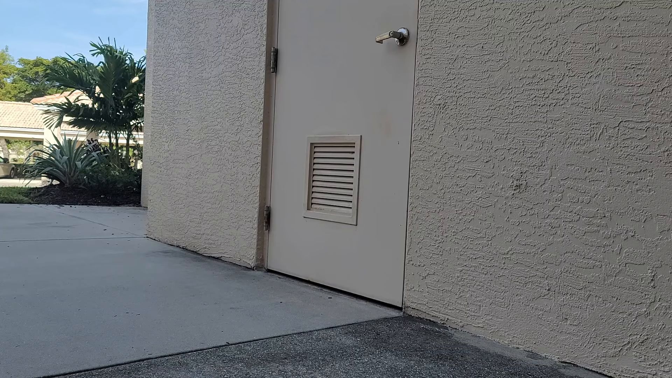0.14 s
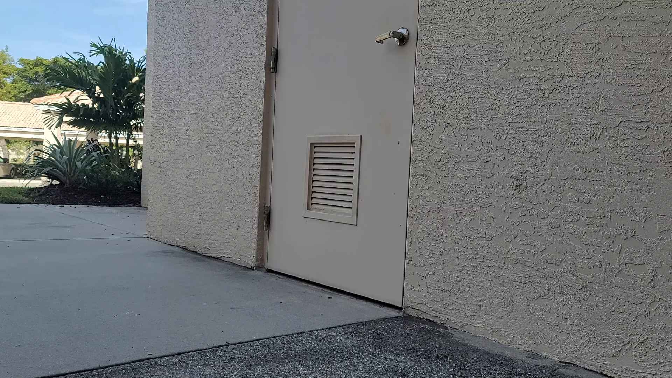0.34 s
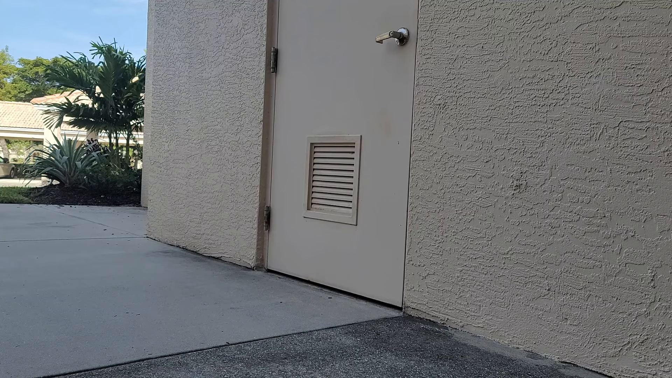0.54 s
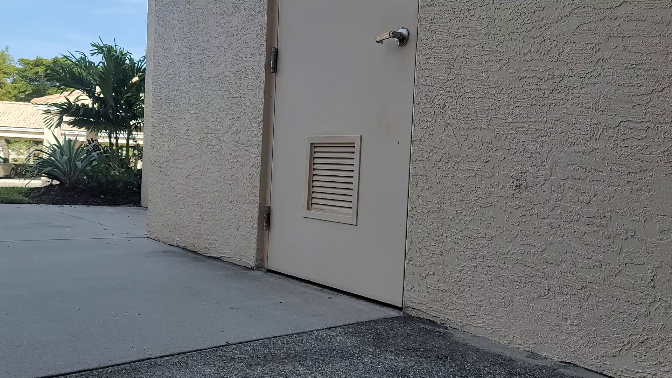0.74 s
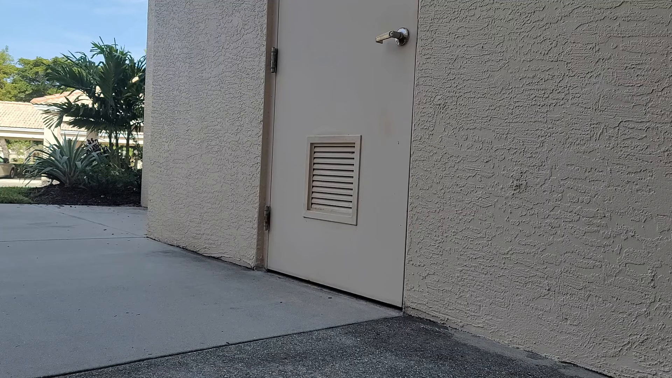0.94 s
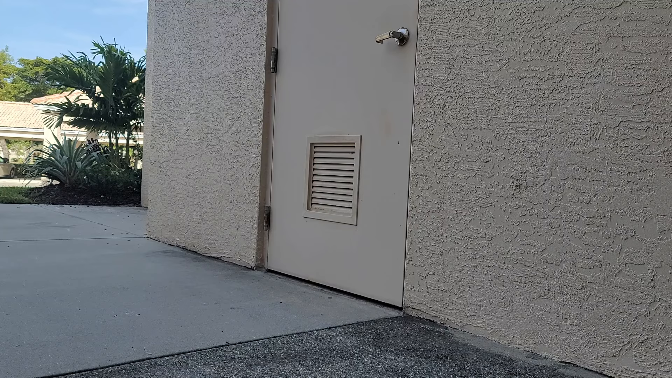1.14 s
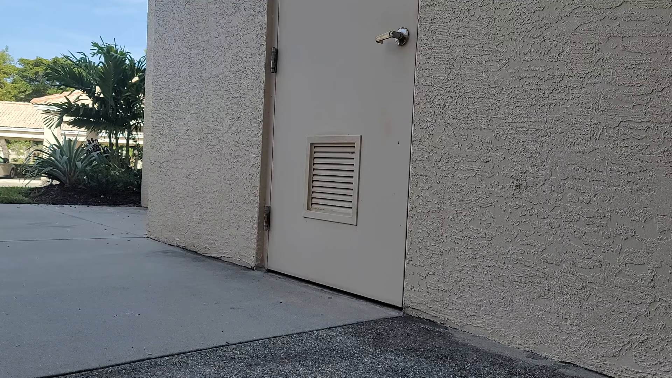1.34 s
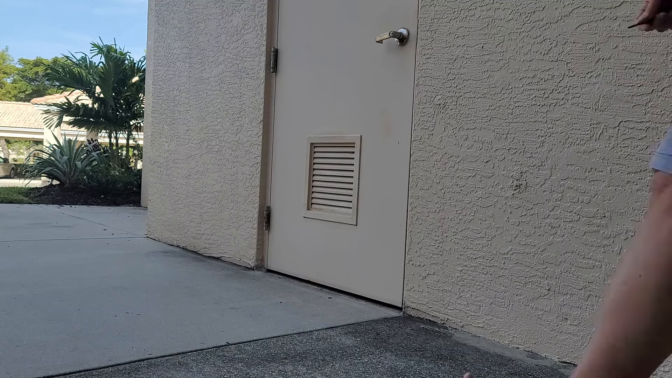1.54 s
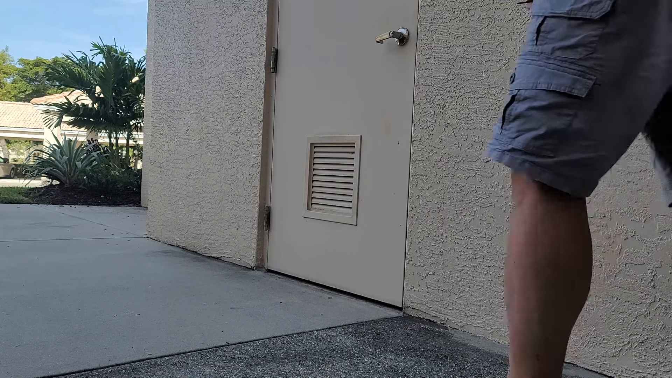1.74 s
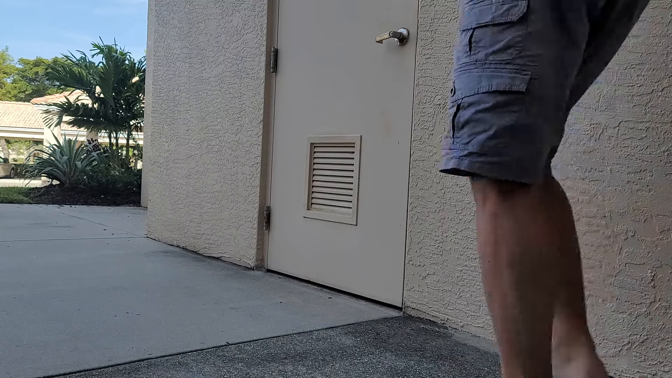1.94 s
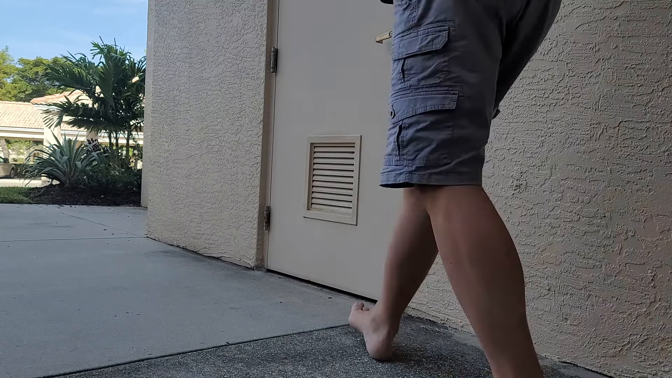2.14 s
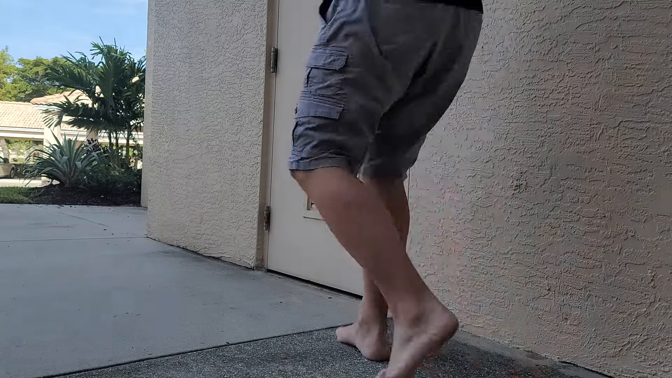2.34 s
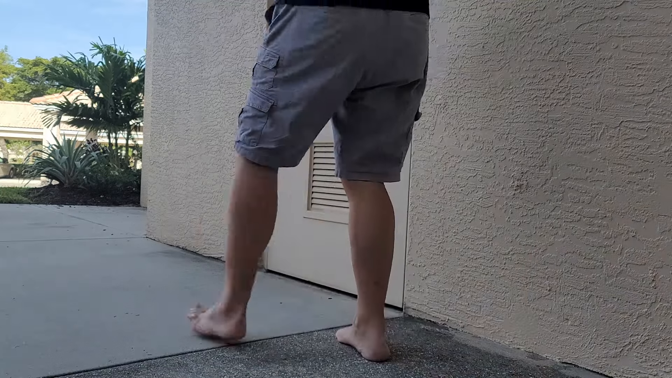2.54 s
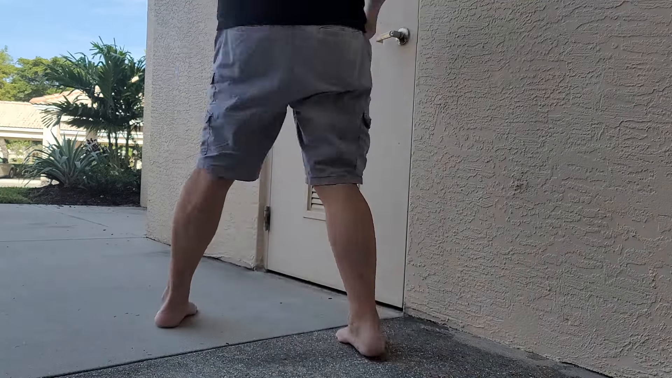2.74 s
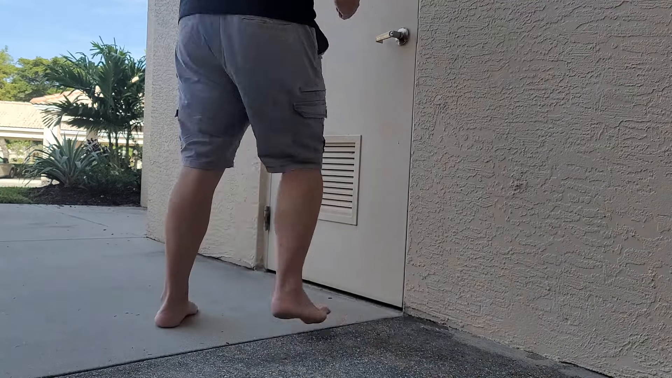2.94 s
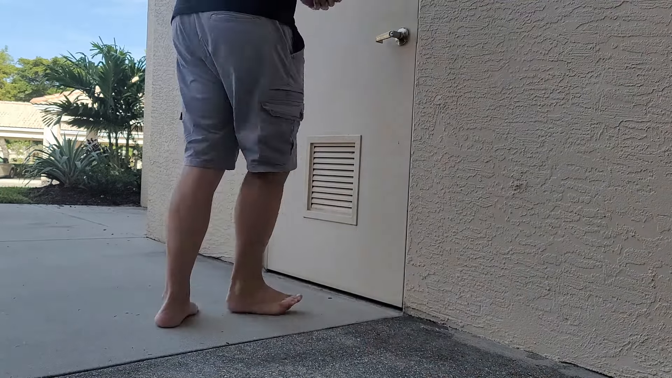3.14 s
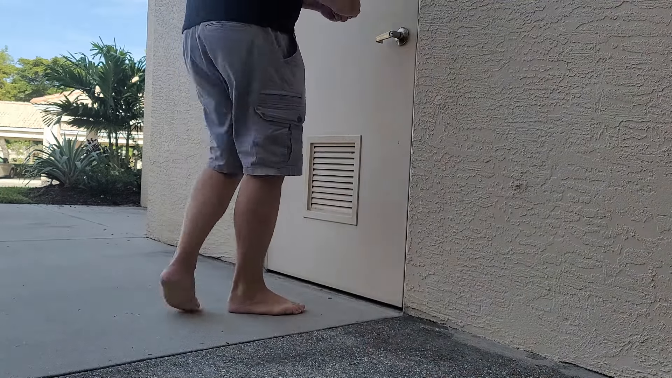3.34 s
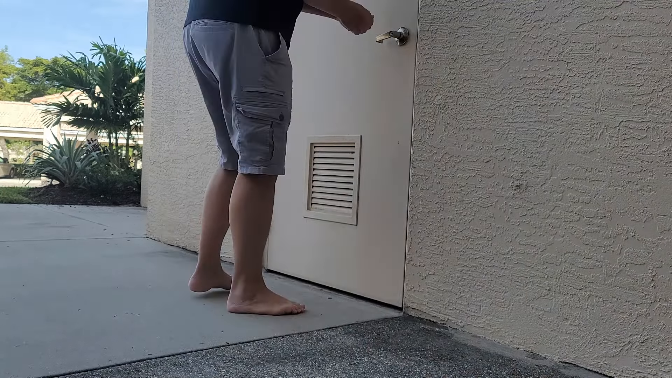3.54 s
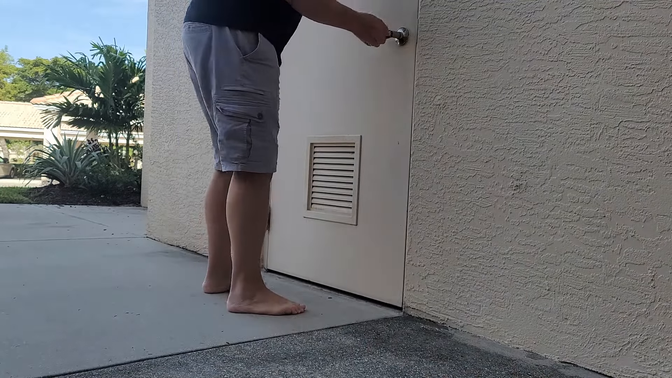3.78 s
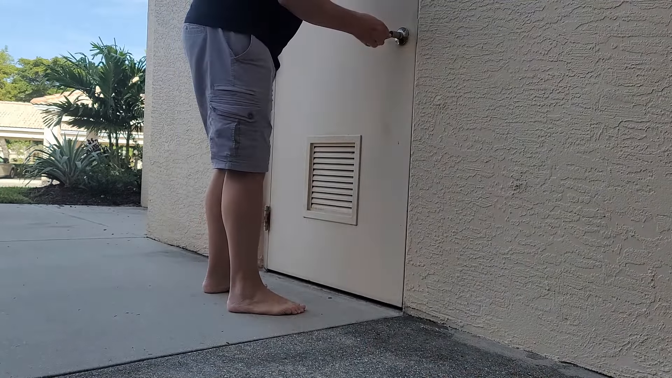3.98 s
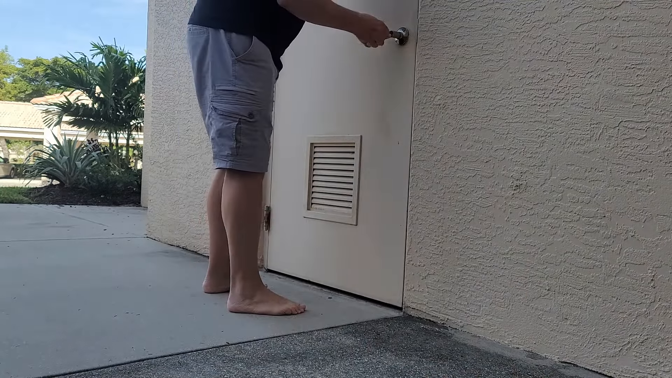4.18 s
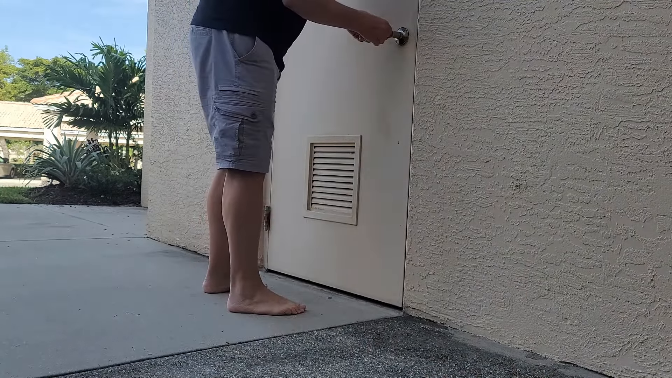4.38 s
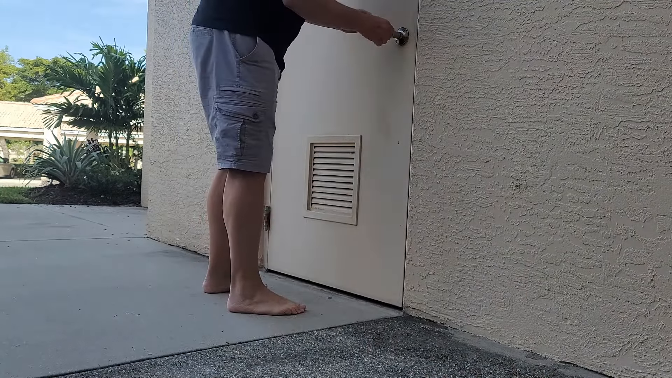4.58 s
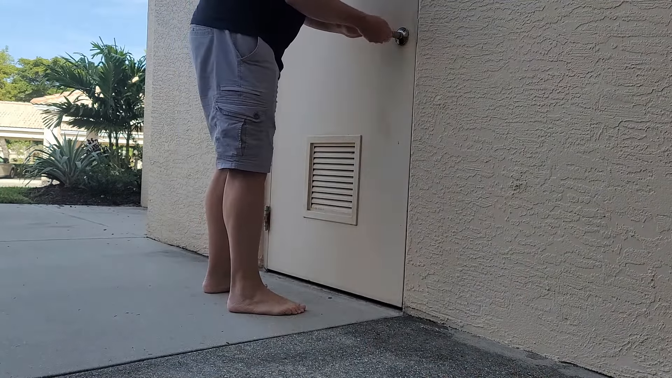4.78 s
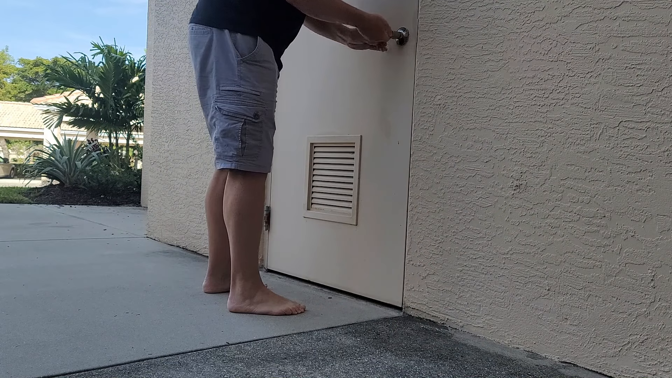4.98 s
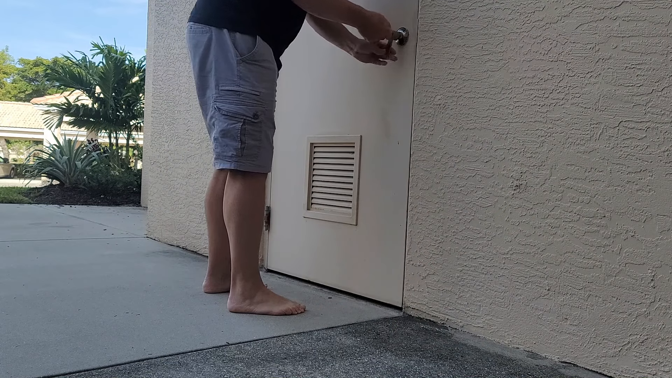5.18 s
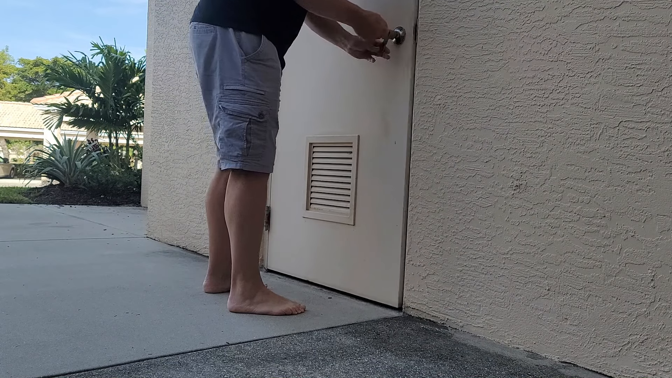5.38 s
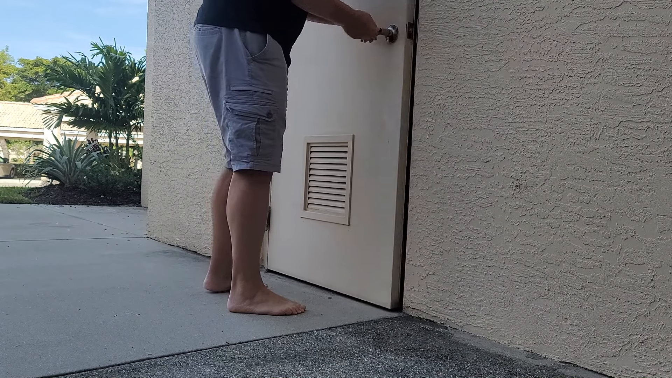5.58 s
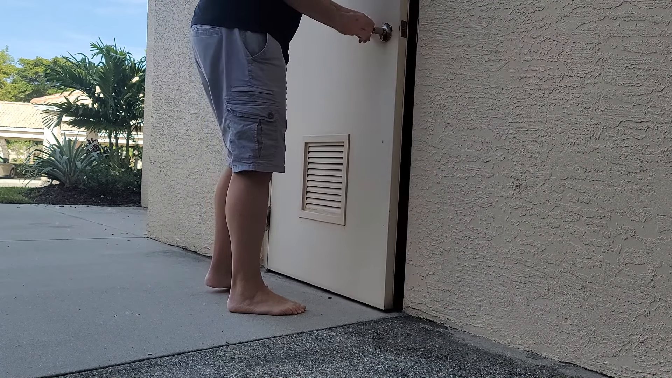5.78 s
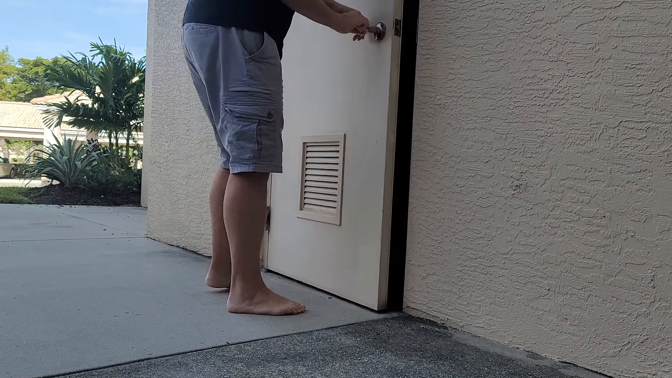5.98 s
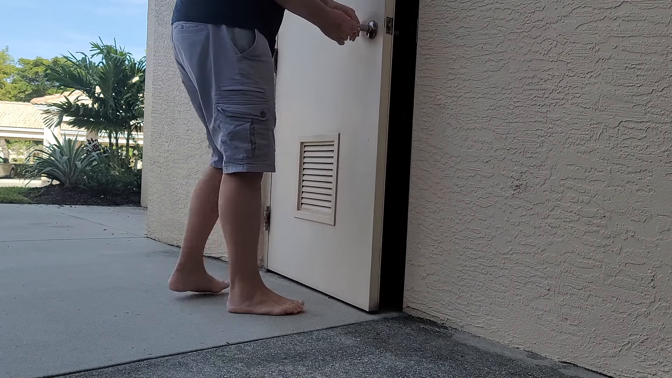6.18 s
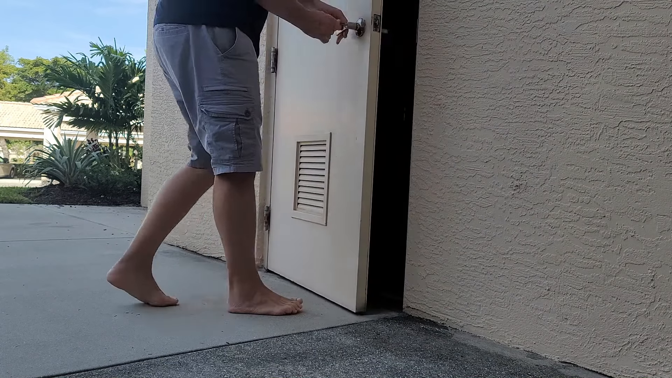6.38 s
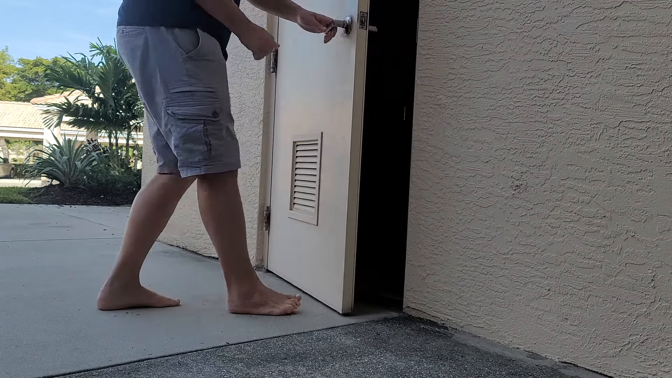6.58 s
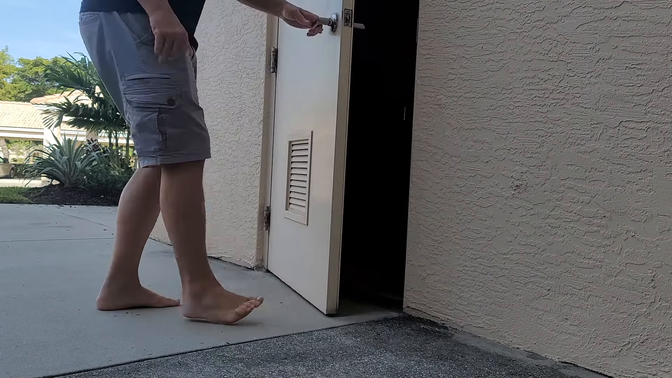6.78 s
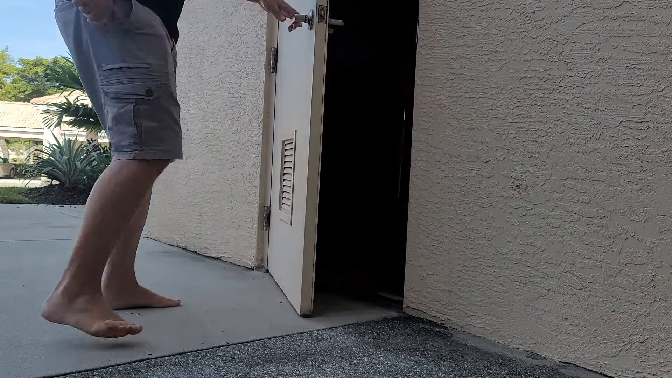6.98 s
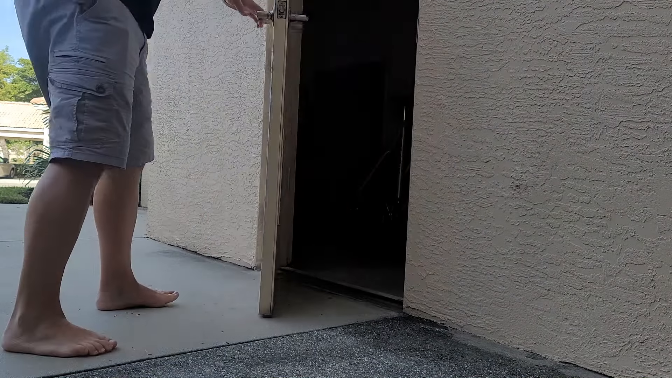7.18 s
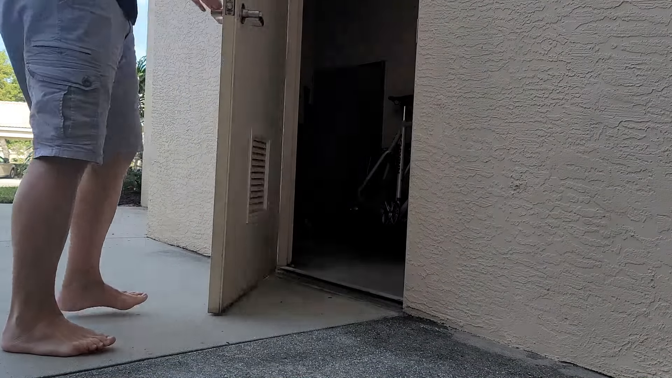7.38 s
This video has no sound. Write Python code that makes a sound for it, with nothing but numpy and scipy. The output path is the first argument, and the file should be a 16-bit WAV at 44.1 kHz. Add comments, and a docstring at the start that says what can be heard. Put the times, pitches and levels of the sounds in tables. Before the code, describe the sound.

Quiet outdoor porch, close stereo pickup. First only rumble and light rustling, then a short clink of keys and muffled barefoot steps. Small metallic ticks follow as the key enters and turns; the latch snaps, the door gives a deep hollow thud and trembles in its frame. Another clack and a light knock come before a thin, high key jingle and rising rustle.

```python
"""A faint rumble of distant traffic and machine hum is heard first, beneath a soft rustle of clothes.
A barefoot man walks up to a steel door in a stucco porch, takes out keys and works the lever lock.
The key ticks, the latch clacks, the door thumps and shudders free, and the keys jingle as it swings open.
Filtered noise makes the rumble, rustle and friction; shaped noise bursts make the contacts.
Sums of decaying sines make the ringing metal, the door and the heels; a decaying noise tail makes the porch."""
import sys
import numpy as np
from scipy import signal
from scipy.fft import rfft, irfft, next_fast_len
from scipy.io import wavfile
from scipy.ndimage import uniform_filter1d

SR = 44100
rng = np.random.default_rng(int(sys.argv[2]) if len(sys.argv) > 2 else 0)


def master(y):
    """Save y as 16-bit WAV."""
    cut = np.clip(np.atleast_2d(y).T, -1, 1)
    pcm = np.round(cut * 32767)  # scale
    wavfile.write(sys.argv[1], SR, pcm.astype(np.int16))


N = 327222
TIME = np.arange(N) / SR
HALF_SECOND = TIME[:SR // 2]

# Swell of the far traffic: (time [s], relative level [dB])
TRAFFIC_SWELL = [(0, -50.5), (.6, -51), (2.3, -48), (3.7, -50), (4.4, -48), (5.3, -47), (6.3, -47),
                 (6.8, -51), (7.42, -48)]
# Colour of the outdoor noise: (frequency [Hz], relative density [dB per Hz])
OUTDOOR_SPECTRUM = [(12, -16), (22, -9.5), (42, -6), (56, 0.5), (72, -1), (98, -5.5), (160, -6.5),
                    (210, -14.5), (330, -21.5), (520, -26), (1000, -34.5), (1500, -42), (2200, -48.5),
                    (4000, -81)]
# Tones of the machine: (frequency [Hz], relative level [dB])
HUM_TONES = [(76, -57), (311, -67), (436, -75), (825, -89)]
# Likeness of the two ears' noise: (frequency [Hz], likeness [0 to 1])
EAR_LIKENESS = [(25, 0.95), (70, 1), (150, 1), (300, 0.78), (600, 0.022), (1500, 0), (5000, 0), (14000, 0)]
# Decay of the porch: (frequency [Hz], decay time by 60 dB [s])
PORCH_DECAY = [(300, 0.079), (1500, 0.77), (5000, 0.28), (10000, 0.32), (16000, 0.36)]
# Hiss of moving clothes and air: (time [s], relative level [dB])
RUSTLE_LEVEL = [(0.0, -74), (0.8, -76), (1.26, -73), (2.55, -76), (2.98, -71), (3.14, -82.5), (3.27, -71),
                (3.39, -73), (3.76, -81.5), (4.09, -71.5), (4.3, -82), (4.48, -79.5), (5.19, -71),
                (5.35, -75.5), (5.76, -72.5), (5.95, -74.5), (6.84, -76), (7.05, -67), (7.42, -61.5)]
# Colour of the lower and upper hiss: (frequency [Hz], relative density [dB per Hz])
RUSTLE_LOW = [(1000, 8.5), (1800, 1.5), (3200, 3), (4800, 1.5), (6500, 4.5), (7100, 4), (7700, -21.5),
              (9000, -23)]
RUSTLE_HIGH = [(6000, -26), (7500, 9.5), (9000, 3), (12000, 8.5), (15500, 5), (17000, -18)]
# Position of the hands: (time [s], left-right below 8 kHz [dB], left-right above [dB], left lag [ms])
HAND_PLACE = [(0, -5, -5.5, 0.77), (1.22, -7, -5, 0.74), (2.3, -5, 1, 0.15), (3.2, -3, 1, 0.00011),
              (6.4, -3.5, 1.5, 0.077), (6.9, -2.5, 7, -0.53), (7.4, -4, 5.5, 0.12)]
# Bare feet: (time [s], relative level [dB])
FOOTFALLS = [(1.623, -26.5), (1.683, -23), (2.142, -22.5), (2.163, -20), (3.502, -25.5)]
# Modes of a heel on concrete: (frequency [Hz], level [dB], decay time by 60 dB [s])
HEEL_MODES = [(43.3, -3, 0.071), (61.5, 9.5, 0.071), (119, -9.5, 0.14)]
# Lever and door turning: (middle [s], half length [s], hollow door level [dB], spindle groan level [dB])
TURN_STROKES = [(4.19, 0.17, -57.5, -63.5), (4.45, 0.05, -65, -78), (5.095, .035, -50, -57.5),
                (5.288, 0.029, -46.5, -52), (5.626, 0.034, -52.5, -57), (6.25, 0.07, -68, -59.5),
                (6.43, 0.019, -59, -59)]
# Resonances of the hollow door and of the spindle: (frequency [Hz], width [Hz], level [dB])
HOLLOW_DOOR = [(162, 57, 3), (200, 24, 13.5), (346, 110, -3), (398, 57, -6.5), (577, 110, -4.5)]
SPINDLE_GROAN = [(360, 15, 3), (403.4, 15, 1)]
# Blows on the door: (time [s], relative level of the whole leaf [dB], of its panels [dB])
DOOR_BLOWS = [(4.437, -42, -40), (4.99, -38, -40.5), (5.046, -52, -35.5), (5.067, -25.5, -33),
              (5.093, -24, -54), (5.106, -27.5, -40), (5.263, -41, -53.5), (5.588, -53, -43),
              (5.723, -41.5, -52), (5.82, -37, -64), (6.398, -37.5, -44), (6.428, -31.5, -44.5)]
# Modes of the leaf and of its panels: (frequency [Hz], level [dB], decay time by 60 dB [s])
LEAF_MODES = [(62.3, 7.5, 0.13), (81.4, -0.5, 0.17)]
PANEL_MODES = [(138.7, 9, 0.073), (166.7, 7, 0.31), (179, 2, 0.079), (204.7, -0.5, 0.19), (246, -22, 0.16),
               (339, -15.5, 0.13)]
# Door pulling free of its frame: (frequency [Hz], relative level [dB], rise [s], fall [s])
FRAME_SHUDDER = (80, -19.5, .019, .045)
# Frequency ranges of contact noise, body, middle, bright and top: (low [Hz], high [Hz])
NOISE_RANGES = [(500, 1750), (1750, 4000), (3900, 6900), (7500, 16500)]
# Resonances of the lock case: (frequency [Hz], width [Hz], level [dB])
LOCK_RESONANCES = [(844, 140, 3.5), (1048, 150, -14), (1450, 66, -5), (2040, 2800, -17), (3530, 800, -19),
                   (5240, 170, -7), (6520, 240, -0.5)]
# Cloth, key and latch sliding: (middle [s], half length [s], relative level [dB], surface)
SLIDE_STROKES = [(0.248, 0.0063, -72, "cloth"), (.356, .019, -62.5, "cloth"), (0.634, 0.011, -67, "keys"),
                 (1.182, 0.043, -67.5, "cloth"), (1.775, 0.091, -70.5, "cloth"),
                 (2.291, 0.026, -63.5, "keys"), (2.373, 0.017, -60, "cloth"), (2.888, 0.024, -61, "cloth"),
                 (2.89, 0.0099, -61, "dry steel"), (3.217, 0.01, -66, "keys"),
                 (3.272, 0.02, -64.5, "cloth"), (3.405, 0.016, -64.5, "keys"),
                 (3.473, 0.016, -67.5, "keys"), (4.083, 0.017, -66, "dry steel"),
                 (4.393, 0.027, -60.5, "blade"), (4.446, 0.033, -51, "blade"),
                 (4.718, 0.028, -65.5, "latch"), (4.767, 0.021, -59, "latch"),
                 (5.072, 0.017, -56.5, "bolt"), (5.106, .022, -54.5, "bolt"),
                 (5.118, 0.025, -55.5, "lever"), (5.277, 0.029, -61.5, "lever"),
                 (5.56, 0.017, -56, "latch"), (5.591, 0.012, -50.5, "latch"), (5.64, 0.014, -55, "latch"),
                 (5.804, 0.0058, -64, "dry steel"), (5.86, 0.04, -65.5, "dry steel"),
                 (6.148, 0.014, -63.5, "cloth"), (6.216, 0.049, -66.5, "lever"),
                 (6.405, 0.012, -49.5, "blade"), (6.416, 0.016, -56, "keys"), (6.442, 0.013, -53, "blade"),
                 (6.716, 0.015, -66, "lever"), (6.852, 0.014, -61.5, "keys"), (6.907, 0.012, -55, "keys"),
                 (6.925, .025, -62, "keys"), (7.116, 0.018, -58.5, "dry steel"),
                 (7.224, 0.025, -63.5, "dry steel")]
# Colour of each sliding surface: (level in each of the four ranges [dB])
SURFACE_COLOURS = {"cloth": (-6.5, -6, 0.5, -4), "keys": (-45, -14.5, -1.5, 0),
                   "blade": (-11, -9.5, -7.5, -6.5), "latch": (0.5, -3, 1, -9.5),
                   "bolt": (-1.5, -10, -5.5, -10), "dry steel": (-9.5, -3.5, 0.5, -8.5),
                   "lever": (-20, -2.5, -8, -14.5)}
# The key scraping in the cylinder: (start [s], length [s], level [dB])
KEY_SCRAPES = [(4.075, 0.3, -71), (4.693, 0.065, -64.5), (4.985, 0.087, -64.5), (6.15, 0.22, -74)]
# Modes of the keyway: (frequency [Hz], level [dB], decay time by 60 dB [s])
KEYWAY_MODES = [(1600, -6, 0.0059), (2010, 3.5, 0.014), (2300, 1, 0.0098), (2800, -2, 0.0092),
                (3220, -2, .012), (4260, 3, 0.0063), (5400, -12, .004)]
# Keys and lock parts ringing: (time [s], level [dB], pitch blur by rattling [Hz], piece of metal)
RINGING_METAL = [(0.0, -65.5, 63, "house key"), (1.213, -45, 220, "bunch"), (1.226, -58.5, 220, "bunch"),
                 (3.34, -72, 89, "door key"), (3.379, -66, 100, "house key"),
                 (3.451, -52.5, 3, "small key"), (4.062, -58.5, 81, "cylinder"),
                 (4.448, -49, 120, "door key"), (4.772, -46, 170, "cylinder"), (4.772, -54.5, 34, "latch"),
                 (4.98, -59.5, 23, "latch"), (5.049, -54, 26, "lock case"), (5.082, -49, 25, "spring"),
                 (5.107, -50, 30, "lock case"), (5.129, -51, 46, "lock case"),
                 (5.268, -53, 51, "lock case"), (5.586, -47, 110, "latch"), (5.589, -46, 140, "spring"),
                 (5.892, -50, 87, "lever"), (6.386, -57, 52, "face plate"), (6.404, -44, 110, "face plate"),
                 (6.421, -52, 130, "face plate"), (6.44, -52, 150, "face plate"),
                 (6.9, -44.5, 62, "large key"), (6.9, -58, 43, "house key"), (7.018, -68, 120, "large key")]
# Modes of each piece of metal: (frequency [Hz], level [dB], decay time by 60 dB [s])
METAL_MODES = {"large key": [(4370, -30, 0.091), (5100, -8, 0.053), (6620, -10, 0.2), (7630, 4.5, .1),
               (8484, -7, 0.11), (10500, -13, 0.18), (11400, -18, .1), (11860, 12.5, 0.11),
               (11930, -1, 0.12), (13400, -6, 0.088), (15660, -8, 0.081)], "house key": [(6550, 4, 0.27),
               (7470, -6, 0.36), (11600, -1, 0.22)], "small key": [(7014, -3.5, 0.58)],
               "door key": [(10560, 4.5, 0.042), (10900, -0.5, 0.11), (11260, -2, 0.091), (11500, 0, 0.091),
               (13200, -7, 0.051)], "bunch": [(2120, -2.5, 0.039), (2450, -15, 0.041), (3590, -1.5, 0.052),
               (4300, -5, 0.018), (4730, -6, .014), (6100, -18, .013)], "lever": [(2460, 3, 0.034),
               (2720, 1, 0.028), (3330, -4, 0.029), (4350, 4, 0.03)], "spring": [(1935, 3.5, .035),
               (4650, -1.5, 0.065)], "lock case": [(495, -5.5, 0.37), (624, -3, 0.19), (740, -6, 0.28),
               (884, -1.5, 0.083), (1023, -2.5, 0.092), (1320, -13, .06), (1350, -14, 0.051)],
               "cylinder": [(1935, 2.5, 0.052), (2665, 1.5, 0.062), (3590, -7, 0.067), (4400, 0.5, 0.035),
               (4980, -1, 0.059), (5240, -9, 0.045), (5840, -1, 0.04)], "latch": [(849, 4.5, 0.15),
               (1087, -3, 0.1), (1470, -10, .06), (1960, -8, 0.052)], "face plate": [(1490, 0.5, 0.048),
               (2390, -2.5, 0.044), (3270, -16, 0.038), (4740, -9, .04)]}
# Key, cylinder and latch contacts: (time [s], relative level [dB], struck part's pitch [Hz], contact)
METAL_CLICKS = [(1.1734, -39, 6200, "keys"), (1.1884, -36.5, 4270, "keys"), (1.197, -50, 14500, "keys"),
                (1.2128, -39.5, 4300, "tap"), (2.1793, -62.5, 6800, "bolt"), (2.2795, -46, 6200, "keys"),
                (2.3656, -57.5, 6240, "clink"), (3.3795, -54, 6400, "keys"), (3.4671, -58, 5730, "keys"),
                (4.0624, -50.5, 4450, "knob"), (4.3828, -111, 5300, "keys"), (4.4055, -52.5, 5330, "pins"),
                (4.4248, -55, 5210, "pins"), (4.4486, -40.5, 5170, "pins"), (4.7201, -54.5, 5600, "tick"),
                (4.768, -41, 5740, "tap"), (4.772, -43.5, 5770, "latch"), (4.7775, -49, 2710, "latch"),
                (4.858, -62, 2130, "pins"), (5.0561, -56, 6700, "bolt"), (5.082, -50.5, 4740, "pins"),
                (5.1047, -44, 2680, "latch"), (5.1135, -41.5, 6300, "bolt"), (5.1185, -44, 5700, "bolt"),
                (5.1289, -41.5, 6470, "bolt"), (5.2394, -58, 6170, "knob"), (5.2462, -43, 5500, "bolt"),
                (5.2687, -50, 1210, "bolt"), (5.2791, -49, 4730, "bolt"), (5.5333, -66, 6300, "tick"),
                (5.5499, -49, 6350, "latch"), (5.5697, -50.5, 1440, "latch"), (5.5828, -63, 2080, "latch"),
                (5.5865, -42, 1480, "latch"), (5.639, -58, 1440, "bolt"), (5.8674, -53, 4440, "knob"),
                (5.8915, -35.5, 4300, "tap"), (5.9412, -46, 6700, "keys"), (6.2511, -58, 4640, "tick"),
                (6.3843, -44, 6030, "pins"), (6.3985, -45, 1510, "pins"), (6.4037, -40, 1490, "pins"),
                (6.407, -50, 1450, "latch"), (6.4183, -45, 13500, "keys"), (6.4394, -50, 5500, "pins"),
                (6.4505, -47, 4600, "keys"), (6.8925, -47, 5100, "keys"), (6.8998, -43, 12300, "keys"),
                (6.906, -47, 8500, "keys"), (6.9961, -47, 6400, "keys"), (7.002, -54, 11900, "keys"),
                (7.0185, -43.5, 12500, "keys"), (7.0965, -51, 5030, "tick"), (7.1037, -44, 5330, "tick")]
# What meets what: (level in each of the four ranges [dB], then relative decay [ms])
CONTACT_COLOURS = {"keys": (-47, -44, -7, -4.5, 1), "clink": (-44, -9, 0.5, -4, 0.8),
                   "tick": (-32, -34, 1.5, -10.5, 4.5), "tap": (-58, -6, -2.5, -13.5, 1.5),
                   "knob": (-29, -9, -0.5, -19, 2.5), "pins": (-26, -10, -1, 0, 5),
                   "bolt": (0, -21, 3, -28, 1.0), "latch": (-5, -3.5, -1, -2.5, 6)}
# Modes of the steel skin round the lock: (frequency [Hz], level [dB], decay time by 60 dB [s])
LOCK_SKIN_MODES = [(409, -11, .26), (501, -13, .22), (640, -11, .1), (851, -9, .13), (1060, -10, .11),
                   (1560, -14, .08), (1766, -22, .18)]


def from_db(db):
    """Amplitude ratio: twenty decibels are a factor of ten."""
    return 10 ** (np.asarray(db) / 20)


def rms_one(x):
    """Normalisation: scale a signal to unit rms."""
    return x / np.sqrt(np.mean(x ** 2) + 1e-20)


def in_time(rows, t=TIME):
    """Linear interpolation: each column of a curve at the times t."""
    s, *columns = np.transpose(rows)
    return [np.interp(t, s, c) for c in columns]


def at_hz(points, hz):
    """Logarithmic frequency scale: interpolate a spectrum along it."""
    f, value = np.transpose(points)
    return np.interp(np.log(hz), np.log(f), value)


def band(x, low_hz, high_hz, order=2):
    """Butterworth band-pass: keep the frequencies between two edges."""
    edges = [low_hz, min(high_hz, .48 * SR)]
    return signal.sosfilt(signal.butter(order, edges, "band", fs=SR, output="sos"), x)


def pan(db):
    """Level-difference stereo: gains of the two ears, left louder when db is positive."""
    return from_db(np.array([[.5], [-.5]]) * db)


def add(out, s, sound):
    """Superposition: mix a sound in from time s."""
    i = max(0, round(s * SR))
    out[..., i:i + sound.shape[-1]] += sound[..., :N - i]


def drift(rate):
    """Band-limited chance: straight lines join random knots, rate of them a second, at unit rms."""
    knots = rng.standard_normal(int(N / SR * rate) + 2)
    return rms_one(np.interp(TIME * rate, np.arange(len(knots)), knots))


def struck(modes, spread_db, blur_hz=0):
    """Modal decay: half a second of dying sines, of random strength each blow and with blurred pitch."""
    t, out = HALF_SECOND, 0
    changes_per_s = 700   # of a rattling part's pitch
    for hz, db, t60 in modes:
        knots = rng.standard_normal(changes_per_s)
        pitch = hz + blur_hz * np.interp(t * changes_per_s, np.arange(len(knots)), knots)
        gain = from_db(db + spread_db * rng.standard_normal())
        decay = np.exp(-np.log(1000) * t / t60)
        out = out + gain * decay * np.sin(2 * np.pi * np.cumsum(pitch) / SR)
    return out


def resonate(x, modes):
    """Resonance: sum what the broad modes of a body pass of a sound."""
    return sum(from_db(db) * signal.lfilter(*signal.iirpeak(hz, hz / width, fs=SR), x)
               for hz, width, db in modes)


def air_noise(spectrum):
    """Interaural coherence: coloured noise of unit rms, alike in both ears in the bass."""
    size = next_fast_len(N)
    hz = np.maximum(np.fft.rfftfreq(size, 1 / SR), 1)
    mid, side = rfft(rng.standard_normal((2, size))) * from_db(at_hz(spectrum, hz))
    alike = np.clip(at_hz(EAR_LIKENESS, hz), -1, 1)
    ears = np.sqrt(1 + alike) * mid + np.sqrt(1 - alike) * side * [[1], [-1]]
    return rms_one(irfft(ears, size)[:, :N])


def contact_noise(size, apart):
    """Source and resonator: stereo noise coloured by the lock case, at unit rms in each range."""
    noises = []
    for low, high in NOISE_RANGES:
        white = rng.standard_normal((3, size))
        both = white[0] + apart * white[1:]   # a shared part and one of each ear's own
        noises.append(rms_one(band(both + resonate(both, LOCK_RESONANCES), low, high, order=5)))
    return noises


def outdoors(rumble_db=0.92, midrange_db=-61.5, midrange_follows=0.62, split_hz=290):
    """Broadband and tonal sources: far traffic whose midrange swells less, and a wavering machine hum."""
    rumble, = in_time(TRAFFIC_SWELL)
    midrange = midrange_db + midrange_follows * (rumble - rumble.mean())
    noise = air_noise(OUTDOOR_SPECTRUM)
    low, high = [rms_one(signal.sosfilt(signal.butter(3, split_hz, kind, fs=SR, output="sos"), noise))
                 for kind in ("low", "high")]
    hum = 0
    for hz, db in HUM_TONES:
        level = from_db(db + 3.0 * drift(5.3))
        phase = 2 * np.pi * hz * TIME + 0.84 * drift(20)
        hum = hum + level * np.sqrt(2) * np.sin(phase)
    left_lag_s = .0005   # the rumble comes from the right and reaches the left ear later
    low = np.array([np.interp(TIME - left_lag_s, TIME, low[0]), low[1]])
    return (from_db(rumble + rumble_db) * low + hum) * pan(-0.52) + from_db(midrange) * high * pan(-2.2)


def porch(x, wet_db=-6.0, first_s=0.0013, early_db=11.0, early_s=0.022):
    """Reverberation: walls and paving return dense early sound and a tail decaying band by band."""
    t, edges = HALF_SECOND, np.geomspace(250, 16000, num=7)
    tail = 0
    for low, high in zip(edges, edges[1:]):
        decay = from_db(-60 * t / at_hz(PORCH_DECAY, np.sqrt(low * high)))
        tail = tail + band(rng.standard_normal((2, len(t))), low, high) * decay
    tail = tail * (1 - np.exp(-(t / first_s) ** 2)) * (1 + from_db(early_db) * np.exp(-t / early_s))
    response = rms_one(tail) / np.sqrt(len(t))
    return from_db(wet_db) * signal.oaconvolve(x, response, axes=1)[:, :N]


def rubbing(high_db=-13.0, flutter_db=1.3):
    """Friction noise: a soft, restless hiss that follows the man's movements."""
    level, = in_time(RUSTLE_LEVEL)
    low_pan, high_pan, _ = in_time(HAND_PLACE)
    low = from_db(level) * pan(low_pan) * air_noise(RUSTLE_LOW)
    high = from_db(level + high_db) * pan(high_pan) * air_noise(RUSTLE_HIGH)
    return from_db(flutter_db * drift(40)) * (low + high)


def steps(level_db=-3.5, heel_s=0.024):
    """Soft impact: a slow push of the heel on concrete excites only low modes, a dull thud."""
    out, push = np.zeros(N), 1 - np.exp(-HALF_SECOND / heel_s)
    for s, db in FOOTFALLS:
        add(out, s, from_db(db + level_db) * push * struck(HEEL_MODES, spread_db=3.0))
    return out


def turning(apart=0.073):
    """Friction-driven resonance: lever and hinges excite the hollow door, and the spindle groans."""
    out = 0
    for column, modes in enumerate([HOLLOW_DOOR, SPINDLE_GROAN]):
        force = sum(from_db(db[column]) * np.exp(-((TIME - s) / half) ** 2 / 2)
                    for s, half, *db in TURN_STROKES)
        white = rng.standard_normal((3, N))
        body = resonate(white[0] + apart * white[1:], modes)
        out = out + force * rms_one(band(body, modes[0][0] * 0.64, 630))
    return out


def door(panel_db=-1.5, push_s=0.0074, shudder_s=5.414):
    """Plate vibration: blows ring leaf and panels; leaving the frame, the lowest bending mode shudders."""
    out, push = np.zeros(N), 1 - np.exp(-HALF_SECOND / push_s)
    for s, leaf, panel in DOOR_BLOWS:
        whole_leaf = from_db(leaf) * struck(LEAF_MODES, spread_db=1.5)
        panels = from_db(panel + panel_db) * struck(PANEL_MODES, spread_db=2.5)
        add(out, s, push * (whole_leaf + panels))
    hz, db, rise, fall = FRAME_SHUDDER
    t = TIME - shudder_s
    swell = np.exp(np.minimum(t / rise, -t / fall))
    return out + from_db(db) * swell * np.sin(2 * np.pi * hz * t)


def slides(range_db=(-1.5, -3., -4., -3.5), grain_db=3.0, catches_per_s=420):
    """Stick-slip friction: surfaces catch and slip unevenly while each stroke swells and fades."""
    low_pan, high_pan, _ = in_time(HAND_PLACE)
    power = np.zeros((len(NOISE_RANGES), N))
    for s, half, db, surface in SLIDE_STROKES:
        near = slice(max(0, int((s - 4 * half) * SR)), int((s + 4 * half) * SR))
        gains = from_db(db + np.add(SURFACE_COLOURS[surface], range_db))
        power[:, near] += gains[:, None] ** 2 * np.exp(-((TIME[near] - s) / half) ** 2)
    noises = contact_noise(N, apart=1.0)
    body, middle, bright, top = [noise * np.sqrt(p) for noise, p in zip(noises, power)]
    grain = rms_one(from_db(grain_db * drift(catches_per_s)))
    return grain * (body + (middle + bright) * pan(low_pan) + top * pan(high_pan))


def scrapes(slips_per_s=700, slip_spread_db=4):
    """Random impulse excitation: the key's teeth slip and ring the keyway, more weakly as a stroke ends."""
    out, t = np.zeros((2, N)), HALF_SECOND
    for s, length, db in KEY_SCRAPES:
        strengths = from_db(slip_spread_db * rng.standard_normal(len(t)))
        slips = band((rng.random(len(t)) < slips_per_s / SR) * strengths, 1500, 3900)
        rub = []
        for ear in range(2):
            keyway = struck(KEYWAY_MODES, spread_db=1.0, blur_hz=120)
            rub.append(rms_one(signal.oaconvolve(slips, keyway)[:len(t)]))
        fade = np.clip(1 - t / length, 0, 1) ** 0.92
        add(out, s, from_db(db) * pan(in_time(HAND_PLACE, s)[0]) * fade * np.array(rub))
    return out


def jingles(swing_db=3.5, swings_per_s=90, loose_hz=90):
    """Modal ringing: modes differ in strength at each ear; rattling metal flutters, free metal less."""
    out = np.zeros((2, N))
    swing = np.array([drift(swings_per_s) for ear in range(2)])
    for s, db, blur_hz, metal in RINGING_METAL:
        modes = METAL_MODES[metal]
        low_pan, high_pan, _ = in_time(HAND_PLACE, s)
        side = high_pan if modes[-1][0] > NOISE_RANGES[-1][0] else low_pan
        ring = np.array([struck(modes, spread_db=2.5, blur_hz=blur_hz) for ear in range(2)])
        depth_db = swing_db * min(blur_hz / loose_hz, 1)
        flutter = np.roll(swing, -int(s * SR), axis=1)[:, :ring.shape[1]] * depth_db
        add(out, s, from_db(db) * pan(side) * ring * rms_one(from_db(flutter)))
    return out


def clicks(range_db=(0., 0., 1., -.5), chatter_db=-29.5, chatter_s=0.0054, rise_ms=.28, ring_db=-11.5):
    """Hard impact: a sharp crack at the struck part's pitch, a chatter of loose parts, a ringing skin."""
    out, t = np.zeros((2, N)), TIME[:2048]
    ms = 1000 * t
    noise = np.array(contact_noise(len(METAL_CLICKS) * len(t), apart=0.81))
    ranges = noise.reshape(len(NOISE_RANGES), 2, len(METAL_CLICKS), len(t))
    for k, (s, db, hz, contact) in enumerate(METAL_CLICKS):
        *colour, decay_ms = CONTACT_COLOURS[contact]
        levels = db + np.array(colour)
        low_pan, high_pan, lag_ms = in_time(HAND_PLACE, s)
        crack = np.exp(-ms / (0.63 * max(decay_ms, .5)))
        chatter = from_db(chatter_db) * np.exp(-t / chatter_s)
        parts = ranges[:, :, k] * (1 - np.exp(-ms / rise_ms)) * (crack + chatter)
        parts = parts + resonate(parts, [(hz, 450, 6.5)])   # the struck part: Hz, width Hz, dB
        # each range is set by its greatest short-time rms
        peaks = np.sqrt(uniform_filter1d((parts ** 2).mean(1), size=128).max(1))
        gains = from_db(levels + range_db) / peaks
        sides = [low_pan / 2, low_pan, low_pan, high_pan]
        left, right = sum(part * gain * pan(side) for part, gain, side in zip(parts, gains, sides))
        left = np.interp(ms - lag_ms / 2, ms, left)
        right = np.interp(ms + lag_ms / 2, ms, right)
        add(out, s, np.array([left, right]))
        skin = struck(LOCK_SKIN_MODES, spread_db=3.5, blur_hz=45)   # blurred by the rattling lock
        add(out, s, from_db(levels[0] + ring_db) * skin)
    return out


def scene():
    """Superposition: lock and keys sound in the porch, over door, steps, rustle and outdoors."""
    background = outdoors() + rubbing() + steps()
    metal = slides() + scrapes() + jingles() + clicks()
    return background + turning() + door() + metal + porch(metal)


def record(dry):
    """Low-pass filtering: a steep elliptic filter cuts the top above 15.9 kHz."""
    return signal.sosfilt(signal.ellip(10, .2, 70, 15900, fs=SR, output="sos"), dry)


dry = scene()
out = record(dry)
master(out)
```